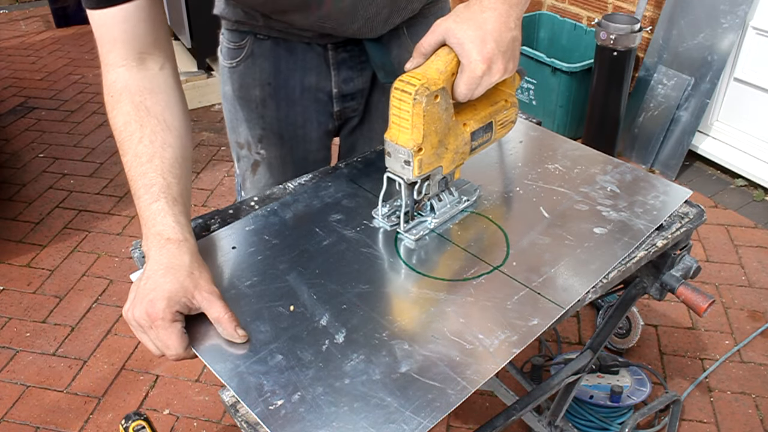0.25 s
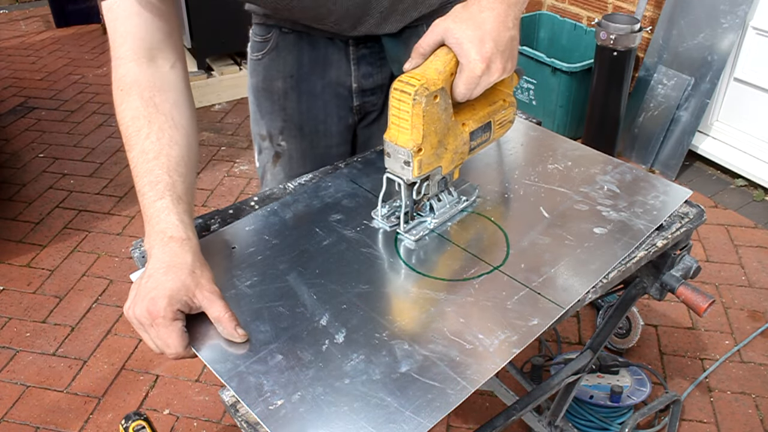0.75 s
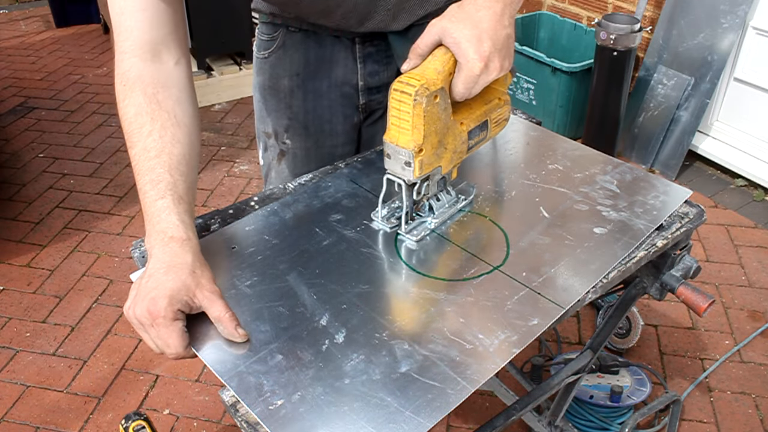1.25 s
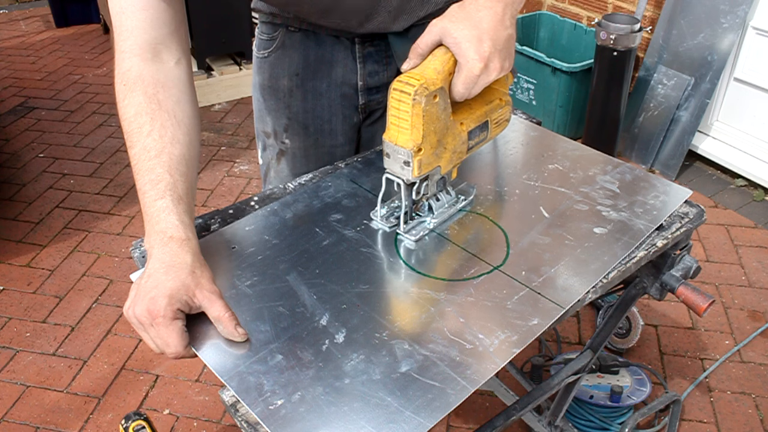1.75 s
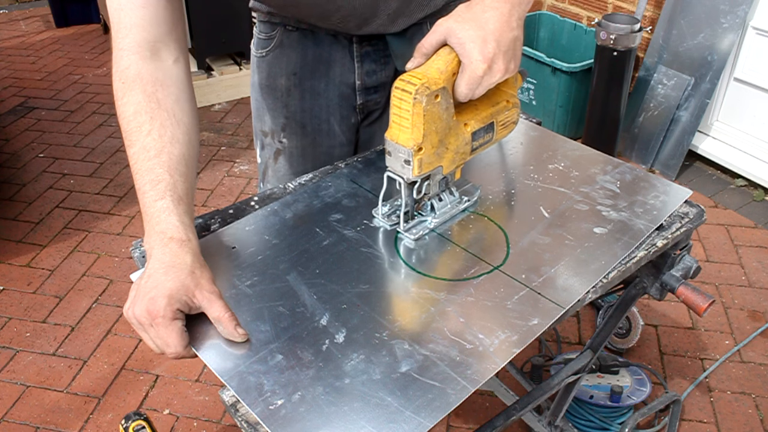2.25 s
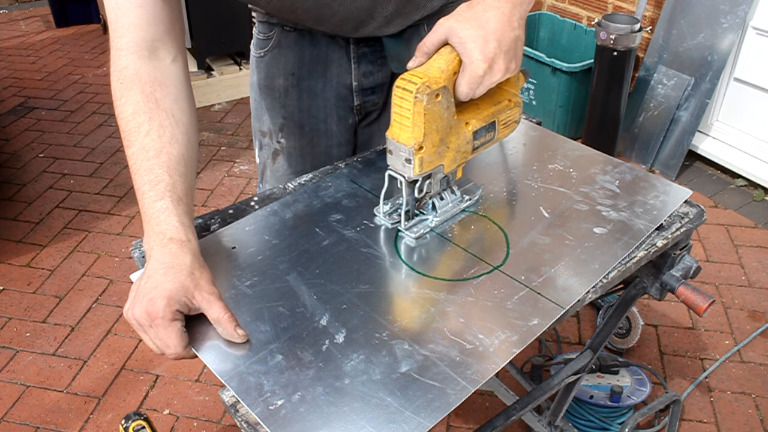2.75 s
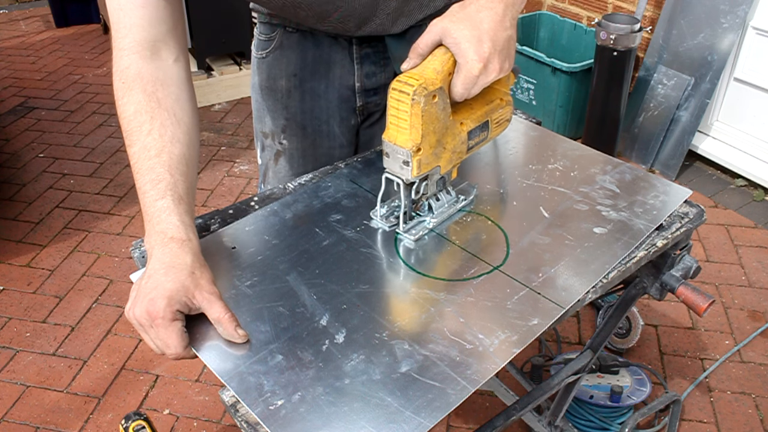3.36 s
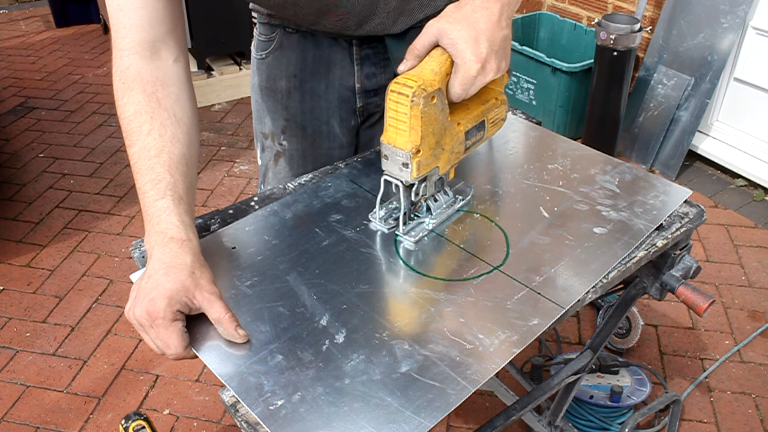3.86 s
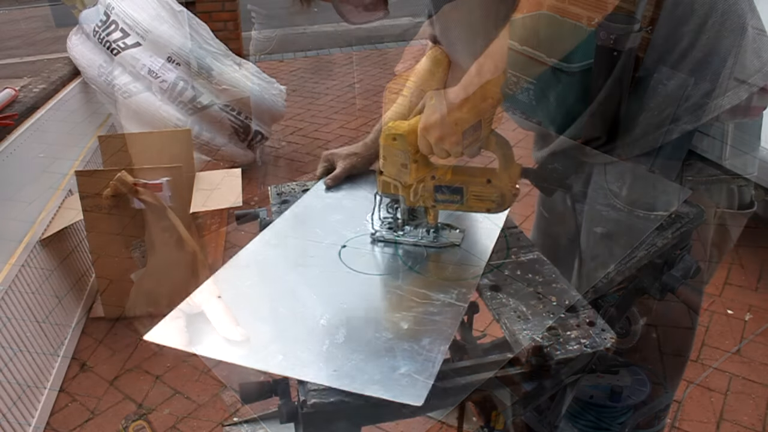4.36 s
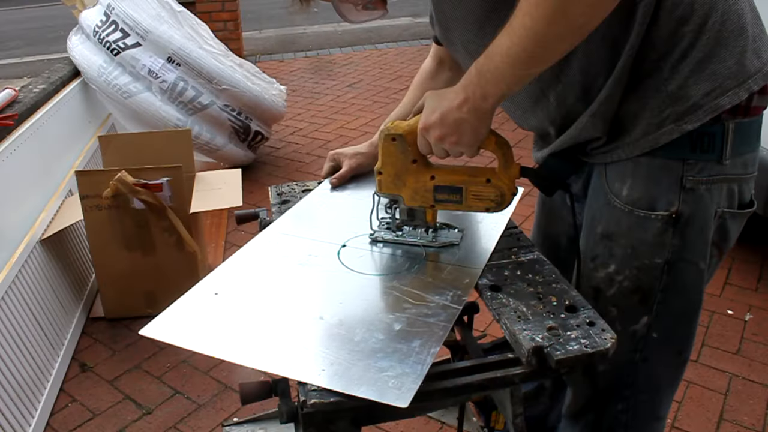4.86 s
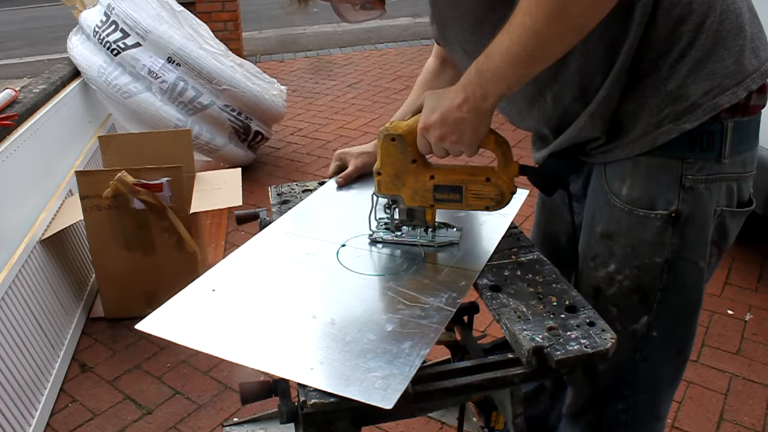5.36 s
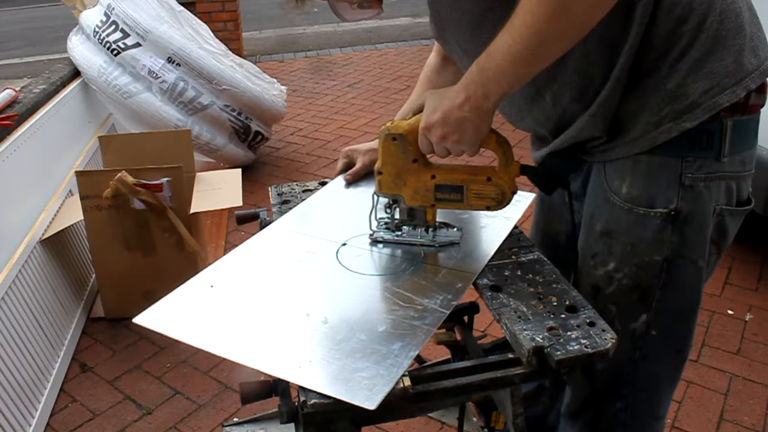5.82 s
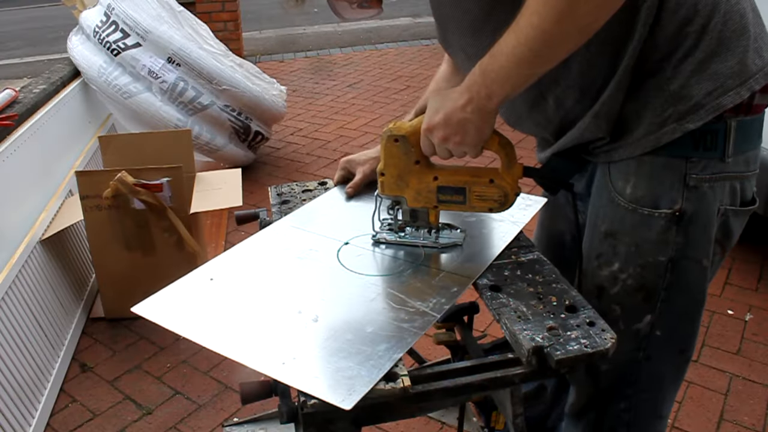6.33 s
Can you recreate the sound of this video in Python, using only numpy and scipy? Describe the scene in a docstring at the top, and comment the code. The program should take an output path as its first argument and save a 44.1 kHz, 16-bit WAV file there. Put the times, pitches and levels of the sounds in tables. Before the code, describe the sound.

An electric jigsaw runs nonstop, heard close and centred, with no noticeable room. First its motor whistles high and thin above a fast mechanical chatter, with metallic snags and uneven surges of bright rasping and ringing. A smooth crossfade after four seconds leads to a slightly lower, denser, almost continuous grinding buzz on the rattling sheet, a short let-up around six seconds, then a loud final push.

```python
"""Jigsaw in thin sheet steel

A corded jigsaw cuts a circle in a thin steel sheet on a workbench, heard close up, alike in both channels.
Sines locked to the crank make the hum, whine and drones; crank-shaped noise makes clatter, rasp and ring.
The bite swells with each push of the hand. Just after four seconds a slower stretch with only a faint,
lower whine takes over in a dissolve."""
import sys
import numpy as np
from scipy import signal
from scipy.fft import rfft, irfft, next_fast_len
from scipy.io import wavfile
from scipy.ndimage import map_coordinates

SR = 44100
rng = np.random.default_rng(int(sys.argv[2]) if len(sys.argv) > 2 else 0)


def wav_record(signal):
    """Record a signal, one row per channel, as 16-bit PCM in the file named by sys.argv[1]."""
    frames = np.transpose(np.atleast_2d(signal))
    bounded = np.clip(frames, -1, 1)
    # unit amplitude maps onto the largest positive 16-bit level
    quanta = np.round(bounded * 32767).astype(np.int16)
    wavfile.write(sys.argv[1], SR, quanta)


N = 290619
TIME = np.arange(N) / SR
FFT_SIZE = next_fast_len(N + 8192)  # spare room for filter tails
FREQ = np.maximum(np.arange(FFT_SIZE // 2 + 1) * SR / FFT_SIZE, 1)  # Hz
GEAR_RATIO, FAN_BLADES = 9.6, 17  # rotor turns per stroke, blades on the fan


# Slaps of the sheet on the shoe within each stroke: (crank angle [turns], level [dB])
SLAPS = [(0.018, 0), (.4, -2.5), (0.718, -4.5)]
# Fan whine of the early stretch, its pitch sagging in places: (time [s], pitch [Hz])
FAN_WHINE = [(0.0, 8525), (0.22, 8557), (0.93, 8429), (1.63, 8464), (1.75, 8427), (2.44, 8555),
             (2.84, 8554), (3.38, 8367), (3.63, 8431), (3.86, 8354), (4.21, 8151), (4.39, 8155),
             (4.5, 8227)]
ROTOR_EARLY = [(s, hz / FAN_BLADES) for s, hz in FAN_WHINE]  # (time [s], speed [turns/s])
# Colour of the early clatter and cooling air: (frequency [Hz], relative level [dB])
RUN_EARLY = [(30, -40), (100, -30), (250, -29.5), (380, -7), (650, -2), (1000, -3), (1500, -3.5),
             (2000, 0.5), (2600, 0), (3900, 1.5), (5600, -2), (8000, -4), (12000, -8), (15500, -11)]
# Broad colour of the early cut: (frequency [Hz], relative level [dB])
CUT_EARLY = [(30, -50), (100, -21), (240, -16.5), (380, -10.5), (650, -18), (1000, -1.5), (1500, 2),
             (2000, 1.5), (2600, -0.5), (3900, -2), (5600, 0), (8000, -6), (12000, -7.5), (15500, -21)]
# Resonances of the held sheet, early: (frequency [Hz], width [Hz], lift [dB])
SHEET_EARLY = [(1200, 130, 7), (1390, 57, 5), (1503, 55, 6), (1690, 50, 8), (1840, 120, 5), (2004, 71, 9.5),
               (2130, 84, 4.5), (2380, 110, 6.5), (3070, 290, 5.5), (3370, 92, 8), (3715, 160, 8.5),
               (4600, 110, 7.5), (5340, 64, 5.5), (14595, 215, 10), (15080, 345, 4)]


def early_saw(bite_db):
    """The saw at about 52 strokes a second, with a strong fan whine."""
    strokes = crank(ROTOR_EARLY, ripple=.0016)
    slaps = blows(strokes, SLAPS, decay_turns=.13, spread_db=1.8, slip_turns=.025)
    cutting = cut(strokes, slaps, bite_db, CUT_EARLY, SHEET_EARLY, slap_db=13.0, throb_db=1.0,
                  jolt_db=-4.5, fresh=0.13, ring_gain_db=-1.5, rasp_gain_db=3.5)
    torn = chips(strokes, bite_db, CUT_EARLY, level_db=-35.5)
    sheet = rattles(strokes, slaps, late=False) + drones(strokes, late=False)
    sheet = sheet + singing(strokes, slaps, bite_db, shift_hz=12, waver=0.31) + snags(spread_db=2.5)
    motor = drive(strokes, bite_db, late=False) + fan(strokes, bite_db)
    loose_parts = clatter(strokes, RUN_EARLY, level_db=-26.0, throb_db=1.15, fresh=0.6)
    return cutting + torn + sheet + motor + loose_parts


# Motor speed of the late stretch: (time [s], speed [turns/s])
ROTOR_LATE = [(4.0, 464), (4.36, 463), (4.41, 450), (4.68, 450), (5.22, 457), (5.5, 447.2), (5.82, 451.5),
              (5.92, 473), (6.01, 462), (6.23, 463), (6.41, 440), (6.48, 450), (6.59, 455)]
# Colour of the late clatter and cooling air: (frequency [Hz], relative level [dB])
RUN_LATE = [(30, -34), (100, -20), (260, -17), (380, -5.5), (650, -2.5), (1000, -6), (1500, -4.5),
            (2000, -3), (2600, -3), (3900, -2), (5600, -2.5), (8000, -5.5), (12000, -9), (15500, -6)]
# Broad colour of the late cut: (frequency [Hz], relative level [dB])
CUT_LATE = [(30, -29), (100, -13.5), (240, -8), (380, -14), (650, -7), (1000, -9.5), (1500, -4), (2000, -3),
            (2600, 0.5), (3900, -1), (5600, 0), (8000, -5), (12000, -7), (15500, -5.5)]
# Resonances of the held sheet, late: (frequency [Hz], width [Hz], lift [dB])
SHEET_LATE = [(1550, 130, 6), (2016, 47, 3.5), (2570, 82, 1.9), (3600, 200, 2), (4050, 160, 2.7),
              (4770, 99, 4.8), (5230, 74, 1.5), (7160, 250, 2.1), (9440, 360, 4), (11200, 200, 2.0),
              (14335, 400, 2.2)]


def late_saw(bite_db):
    """The saw at about 47 strokes a second, with only a faint, lower whine among its drive tones."""
    strokes = crank(ROTOR_LATE, ripple=.002)
    slaps = blows(strokes, SLAPS, decay_turns=.13, spread_db=2.1, slip_turns=.025)
    cutting = cut(strokes, slaps, bite_db, CUT_LATE, SHEET_LATE, slap_db=4, throb_db=0.5,
                  jolt_db=-6.5, fresh=0.36, ring_gain_db=-1.5, rasp_gain_db=2.05)
    sheet = rattles(strokes, slaps, late=True) + drones(strokes, late=True)
    motor = drive(strokes, bite_db, late=True)
    loose_parts = clatter(strokes, RUN_LATE, level_db=-24.0, throb_db=1.0, fresh=0.5)
    return cutting + sheet + motor + loose_parts


# Pushes of the hand, leaning in or easing: (start [s], end [s], bite at start [dB], lean [dB/s])
PUSHES = [(0.186, 0.638, -13, 9), (0.667, 0.866, -3.5, 12), (0.89, 1.025, -3, -11),
          (1.043, 1.147, -0.5, -10), (1.204, 1.343, -4, 5), (1.374, 1.764, -8.5, 21), (2.15, 2.84, -20, 2),
          (2.842, 3.044, -7.5, 2), (3.062, 3.338, -0.5, 4.5), (3.35, 3.61, -13, -18), (3.613, 4.2, -1, 4),
          (4.212, 5.793, -0.45, -0.3), (6.07, 6.378, -6.5, 25.5), (6.39, 6.601, 1.7, -4)]
PUSH_ATTACK_S, PUSH_RELEASE_S = 0.063, 0.094
IDLE_BITE_DB = -26  # between pushes the blade only brushes the edge


def bite():
    """How hard the blade bites, in dB: each push builds, holds with a steady lean and lets go."""
    force = from_db(IDLE_BITE_DB)
    for start, end, level_db, lean in PUSHES:
        attack = np.clip((TIME - start) / PUSH_ATTACK_S, 0, 1)
        release = np.clip(1 - (TIME - end) / PUSH_RELEASE_S, 0, 1)
        leaned_db = level_db + lean * (np.clip(TIME, start, end) - start)
        force = force + attack * release * from_db(leaned_db)
    return 20 * np.log10(force)


RING_DB, RASP_DB = -27.5, -25  # at 0 dB bite, before each stretch's own gain
RASP_FOLLOWS = 0.93  # dB of rasp per dB of bite
RUMBLE_HZ, RING_RASP_SPLIT_HZ = 676, 2220  # rumble below, ring between, rasp above


def cut(strokes, slaps, bite_db, spectrum, resonances, slap_db, throb_db, jolt_db, fresh,
        ring_gain_db, rasp_gain_db):
    """Slaps ring the sheet over a noise rumble; the teeth rasp hardest on the upstroke and each jolt."""
    ring_db, rasp_db = RING_DB + bite_db, RASP_DB + RASP_FOLLOWS * bite_db
    catching_db = 0.93 * drift(21.866)  # the teeth catch and slip unevenly
    sheet = colour(spectrum, resonances)

    buzz = (1 + from_db(slap_db) * slaps) * rubbing(strokes, jitter_s=1.5e-5, fresh=fresh, wear_rate=1.52)
    ring_band = np.sqrt(below(RING_RASP_SPLIT_HZ) * (1 - below(RUMBLE_HZ)))
    ring = through(buzz, sheet * ring_band)

    rumble = from_db(-18.5) * through(rng.standard_normal(N), sheet * np.sqrt(below(RUMBLE_HZ)))

    upstroke = from_db(throb_db * np.cos(2 * np.pi * strokes) + .5 * drift(60))
    jolts = 1 + from_db(jolt_db) * slaps
    teeth = upstroke * jolts * rubbing(strokes, jitter_s=1.5e-5, fresh=0.45, wear_rate=1.98)
    rasp = through(teeth, sheet * np.sqrt(1 - below(RING_RASP_SPLIT_HZ)))

    mix = from_db(ring_db + ring_gain_db) * ring + from_db(ring_db) * rumble
    mix = mix + from_db(rasp_db + rasp_gain_db) * rasp
    return from_db(catching_db) * mix


def blows(strokes, pattern, decay_turns, spread_db, slip_turns):
    """Force of the blows within each stroke: sudden, dying away, uneven in timing and strength."""
    out = 0
    for angle, db in pattern:
        turn = strokes - angle + slip_turns * drift(45)
        strength_db = db + spread_db * np.clip(rng.standard_normal(512), -2, 2)  # one draw per stroke
        strength = from_db(strength_db)[np.floor(turn).astype(int)]
        out = out + strength * np.exp(-(turn % 1) / decay_turns)
    return out


# Resonances of the blade: (frequency [Hz], width [Hz], lift [dB])
BLADE = [(10960, 300, 4), (12700, 300, 10)]
CHIP_HZ = 7500  # the crackle lies above this


def chips(strokes, bite_db, spectrum, level_db):
    """On every upstroke the teeth tear off a chip: a short, bright noise burst of uneven strength."""
    tearing = blows(strokes, [(0, 0)], decay_turns=.2, spread_db=3, slip_turns=.05)
    bright = colour(spectrum, BLADE) * np.sqrt(1 - below(CHIP_HZ))
    return from_db(level_db + bite_db) * through(tearing * rng.standard_normal(N), bright)


# Sheet modes that break into a rattle as the cut advances and the grip shifts:
# (start [s], end [s], frequency [Hz], level [dB])
RATTLES = [(0.28, 0.88, 2160, -40), (0.72, 1.2, 2060, -42), (0.78, 1.2, 1470, -39), (0.9, 1.8, 1196, -43),
           (0.72, 1.82, 3700, -38), (1.25, 1.82, 1400, -41), (1.25, 1.82, 2130, -38), (1.3, 1.8, 5170, -37),
           (2.87, 3.12, 1880, -38), (3.1, 3.4, 1847, -32.5), (3.12, 3.4, 1395, -35),
           (3.14, 3.39, 1550, -33), (3.11, 3.38, 3230, -31), (3.647, 4.4, 2020, -35.5),
           (3.68, 4.3, 1864, -37), (3.662, 4.15, 3740, -39.5), (3.68, 4.28, 4590, -40),
           (3.66, 4.2, 5440, -42), (3.846, 4.28, 3030, -40), (4.22, 5.3, 1575, -38), (4.45, 5.8, 2210, -41),
           (4.5, 5.8, 3550, -40), (4.6, 5.3, 4120, -41), (4.92, 5.75, 4810, -40), (4.899, 5.7, 2920, -42),
           (5.32, 5.69, 1790, -34.5), (5.69, 5.79, 3943, -32), (5.86, 6.3, 3860, -41),
           (6.1, 6.65, 1390, -38), (6.3, 6.65, 3120, -39)]
RATTLE_WIDTH_HZ, RATTLE_FADE_S = 39, 0.043


def rattles(strokes, slaps, late):
    """The slaps keep one mode of the sheet ringing for a while, stroke after stroke."""
    out = np.zeros(N)
    knocks = slaps ** 2 * rubbing(strokes, jitter_s=1.5e-5, fresh=0.24, wear_rate=4)
    for start, end, hz, level_db in RATTLES:
        if (start > DISSOLVE[0][0]) == late:
            span = (TIME > start) & (TIME < end)
            to_edge = np.minimum(TIME[span] - start, end - TIME[span])
            held = np.minimum(to_edge / RATTLE_FADE_S, 1)
            ring = signal.lfilter(*signal.iirpeak(hz, hz / RATTLE_WIDTH_HZ, fs=SR), knocks[span])
            out[span] += from_db(level_db) * held * rms_one(ring)
    return out


# Drones of the sheet on one harmonic of the strokes, as the grip shifts:
# (start [s], end [s], harmonic [count], level [dB])
DRONES = [(1.25, 1.85, 17, -47), (2.85, 3.5, 8, -48.5), (2.84, 3.28, 38, -38.5), (2.9, 3.25, 46, -44),
          (2.7, 3.4, 4, -57), (3.68, 4.25, 20, -42), (3.65, 4.1, 22, -47), (1.85, 3.0, 16, -46.5),
          (4.6, 5.86, 33, -38.5), (4.2, 4.75, 34, -38.5), (4.47, 5.22, 27, -44), (4.5, 4.95, 26, -41),
          (4.3, 5.4, 11, -46.5), (4.75, 5.32, 57, -44), (4.78, 5.3, 14, -48), (4.8, 5.25, 19, -48),
          (5.12, 5.85, 30, -36.5), (5.25, 5.75, 37, -41), (5.3, 5.8, 26, -40.5), (5.33, 5.86, 44, -40),
          (5.45, 5.95, 12, -48), (5.92, 6.14, 13, -45), (5.78, 6.24, 7, -44.5), (6.06, 6.2, 4, -46),
          (6.2, 6.5, 4, -52), (6.08, 6.48, 8, -43.5), (6.2, 6.7, 19, -47), (6.2, 6.42, 16, -48),
          (6.33, 6.7, 15, -40.5)]
DRONE_FADE_S = 0.055


def drones(strokes, late):
    """Each drone of the stretch builds, holds and fades, in step with the blade."""
    out = 0
    for start, end, count, level_db in DRONES:
        if (start > DISSOLVE[0][0]) == late:
            held = np.clip(np.minimum(TIME - start, end - TIME) / DRONE_FADE_S, 0, 1)
            out = out + from_db(level_db) * held * tone(strokes * count + rng.random(), waver=0.22)
    return out


# Sharp sheet modes singing in step with the blade: (frequency [Hz], level at 0 dB bite [dB])
SINGING = [(1394, -42), (1497, -42.5), (1701, -39.5), (1862, -37.5), (3715, -43), (4590, -41)]
SINGING_FOLLOWS = 1.13  # dB of singing per dB of bite


def singing(strokes, slaps, bite_db, shift_hz, waver):
    """The two nearest stroke harmonics drive each wandering mode and hand over; slaps swell them."""
    stroke_rate = in_time(ROTOR_EARLY)[0] / GEAR_RATIO
    out = 0
    for hz, level_db in SINGING:
        place = (hz + shift_hz * drift(3.12)) / stroke_rate  # the mode counted in harmonics
        for odd in (0, 1):  # nearest even harmonic, then nearest odd one
            harmonic = 2 * np.round((place - odd) / 2) + odd
            in_tune = np.cos(np.pi / 2 * (place - harmonic))
            out = out + from_db(level_db) * in_tune * tone(strokes * harmonic + rng.random(), waver)
    swell = rms_one(signal.lfilter(*signal.butter(2, 160, fs=SR), slaps))
    return from_db(SINGING_FOLLOWS * bite_db) * swell * out


# Single teeth snagging as the blade feels its way in: (time [s], level before mode levels [dB])
SNAGS = [(0.225, -19), (0.245, -20), (0.286, -23), (0.303, -20), (0.340, -26), (0.416, -23), (0.439, -25),
         (0.458, -31), (0.477, -22), (0.494, -20), (0.514, -19), (0.534, -23), (0.570, -22), (0.611, -20),
         (0.631, -22), (0.650, -19), (0.668, -18), (0.686, -22), (0.706, -19), (0.727, -22), (0.745, -21),
         (0.763, -24), (0.783, -26), (0.820, -22), (0.861, -18), (0.881, -24), (1.114, -15)]
# What a snag sets ringing: (frequency [Hz], relative level [dB], time to fall 60 dB [s])
SNAG_MODES = [(1840, -6, .055), (2010, -9, .04), (2160, -5, .045), (3720, -8, .025), (4110, -8, .025),
              (5380, -11, .025)]


def snags(spread_db):
    """Each snag plucks the sheet, which rings briefly with a slightly different mix of modes."""
    out = np.zeros(N)
    after = TIME[:SR // 10]
    for s, db in SNAGS:
        start = round(s * SR)
        for k, (hz, mode_db, t60) in enumerate(SNAG_MODES):
            level_db = db + mode_db + spread_db * rng.standard_normal()
            decay = from_db(level_db - 60 * after / t60)
            polarity = (-1) ** k
            out[start:start + len(after)] += polarity * decay * np.cos(2 * np.pi * hz * after)
    return out


# Drive tones, each at a sum of multiples of the rotor and stroke speeds, before loss under load:
# (rotor multiple [count], stroke multiple [count], early level [dB], late level [dB])
DRIVE_TONES = [(0, 3, -69, -66), (0, 4, -62, -65), (0, 6, -65, -66), (0, 7, -51.5, -56), (0, 8, -59, -63),
               (0, 9, -57, -61), (1, 0, -41.5, -55), (0, 11, -48.5, -55), (0, 13, -55, -52),
               (0, 14, -54, -54), (0, 16, -56, -60), (0, 17, -55, -57), (0, 19, -59, -52), (8, 0, -44, -56),
               (8, 2, -39.5, -55), (8, 4, -42, -56), (16, 0, -62, -42.5)]
HUM_LOAD_LOSS_DB = 3  # loss of the rotor tones at 0 dB bite


def drive(strokes, bite_db, late):
    """Rotor and gear tones, weaker under load, with flickering tones at multiples of the stroke rate."""
    loaded = from_db(-HUM_LOAD_LOSS_DB * from_db(bite_db))
    out = 0
    for rotor, stroke, *levels in DRIVE_TONES:
        cycles = strokes * (round(rotor) * GEAR_RATIO + round(stroke))
        load = loaded if rotor else 1
        out = out + from_db(levels[late]) * load * tone(cycles, waver=0.11 if rotor else 0.35)
    return out


FAN_DB, FAN_DUCK_DB = -27, 3  # level running free, and its dip at 0 dB bite


def fan(strokes, bite_db):
    """The fan blades whistle past the vents, quieter while the cut is loud, as if ducked by auto gain."""
    level = from_db(FAN_DB - FAN_DUCK_DB * from_db(bite_db))
    return level * tone(strokes * GEAR_RATIO * FAN_BLADES, waver=0.018)


# Resonances of the saw's housing and vents: (frequency [Hz], width [Hz], lift [dB])
HOUSING = [(1440, 170, 5), (4200, 400, 2.5), (7190, 250, 4), (9700, 220, 3.5), (10430, 310, 6.5),
           (13000, 400, 3)]


def clatter(strokes, spectrum, level_db, throb_db, fresh):
    """Gears, guide roller and cooling air: noise that throbs once and twice per stroke."""
    throb = from_db(throb_db * (np.cos(2 * np.pi * strokes) + 0.94 * np.cos(4 * np.pi * strokes)))
    noise = throb * rubbing(strokes, jitter_s=2.5e-5, fresh=fresh, wear_rate=1.24)
    return from_db(level_db) * through(noise, colour(spectrum, HOUSING))


def crank(rotor_speed, ripple):
    """Strokes made so far; the crank speeds up and slows a little within each turn."""
    strokes = np.cumsum(in_time(rotor_speed)[0]) / SR / GEAR_RATIO
    return strokes + ripple * np.sin(2 * np.pi * strokes) / (2 * np.pi)


def rubbing(strokes, jitter_s, fresh, wear_rate, size=1024):
    """Rough surfaces pass again on every stroke; the pattern slowly changes and part is new each time."""
    angle = strokes + jitter_s * np.gradient(strokes) * SR * drift(120)  # a little early or late
    grain = np.exp(2j * np.pi * rng.random((2, size // 2 + 1)))
    grain[:, :3] = 0  # fine roughness: nothing as long as half a stroke
    first, second = rms_one(irfft(grain))[:, (angle * size).astype(int) % size]
    wear = 0.5 * drift(wear_rate)
    repeated = first * np.cos(wear) + second * np.sin(wear)
    fresh = np.clip(fresh, 0, 1)
    return np.sqrt(1 - fresh) * repeated + np.sqrt(fresh) * rng.standard_normal(N)


def tone(cycles, waver):
    """A machine tone that wavers in strength and phase."""
    wobble = waver * drift(11)
    phase = (2 * np.pi * (cycles % 1) + wobble).astype(np.float32)
    return np.sqrt(2) * (1 + wobble) * np.sin(phase)


def colour(spectrum, resonances=()):
    """Frequency response: a broad spectrum, lifted by ringing resonances."""
    hz, level_db = np.transpose(spectrum)
    lift = 1
    for f, width, db in resonances:
        lift = lift + (from_db(db) - 1) / (1 + 2j * (FREQ - f) / width)
    return from_db(np.interp(np.log(FREQ), np.log(hz), level_db)) * lift


def through(x, response):
    """Filter x by a frequency response; unit rms."""
    return rms_one(irfft(rfft(x, FFT_SIZE) * response, FFT_SIZE)[:N])


def below(hz):
    """Share of the power that passes a steep low-pass."""
    return 1 / (1 + (FREQ / hz) ** 10)


def drift(rate):
    """Smooth random wander through knots of spread 1, rate knots a second."""
    knots = rng.standard_normal(int(TIME[-1] * rate) + 4)
    coarse = map_coordinates(knots, [1 + TIME[::64] * rate], order=3, mode="nearest")
    return np.interp(TIME, TIME[::64], coarse)


def in_time(rows):
    """Each column of a curve, at every sample."""
    s, *columns = np.transpose(rows)
    return [np.interp(TIME, s, c) for c in columns]


def from_db(db):
    """Decibels to gain."""
    return 10 ** (np.asarray(db) / 20)


def rms_one(x):
    """Scale to unit rms."""
    return x / np.sqrt(np.mean(x ** 2) + 1e-20)


# Late stretch's share of the power, held at its end values outside: (time [s], share [0-1])
DISSOLVE = [(3.95, 0.07), (4.25, 0.35), (4.45, 0.66), (4.54, 0.96)]


def scene():
    """One stretch fades into the other at constant power; both channels are alike."""
    late = np.clip(in_time(DISSOLVE)[0], 0, 1)
    bite_db = bite()
    mono = np.sqrt(1 - late) * early_saw(bite_db) + np.sqrt(late) * late_saw(bite_db)
    fade_in = np.minimum(TIME / .006, 1)
    return fade_in * np.array([mono, mono])


OVERLOAD, CUTOFF_HZ = .3, 15800  # ceiling of the rounding, top of the band


def record(dry):
    """The loudest peaks are rounded off and the top is cut steeply."""
    rounded = dry / (1 + (dry / OVERLOAD) ** 4) ** .25
    low_pass = signal.ellip(12, .1, 90, CUTOFF_HZ, fs=SR, output="sos")
    return signal.sosfilt(low_pass, rounded)


dry = scene()
out = record(dry)
wav_record(out)
```